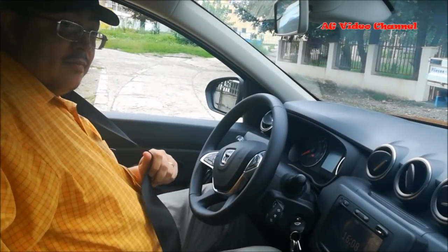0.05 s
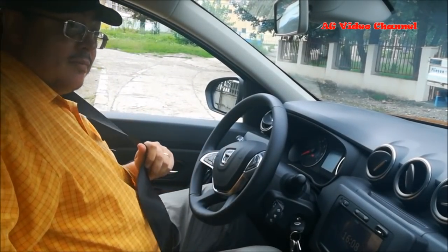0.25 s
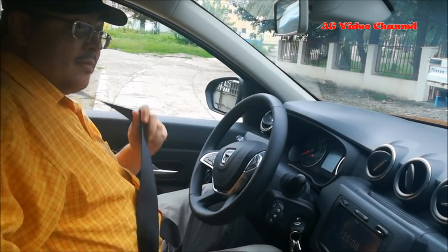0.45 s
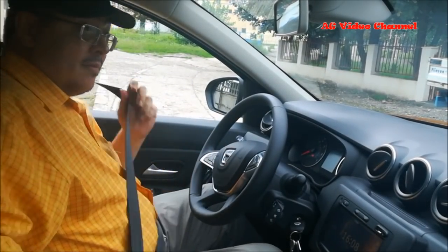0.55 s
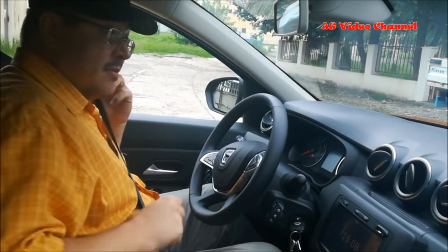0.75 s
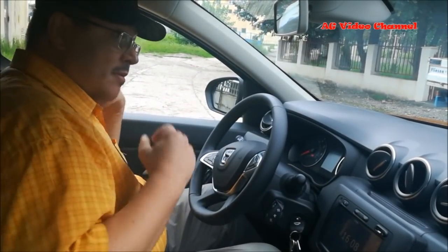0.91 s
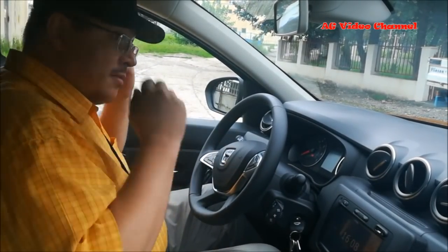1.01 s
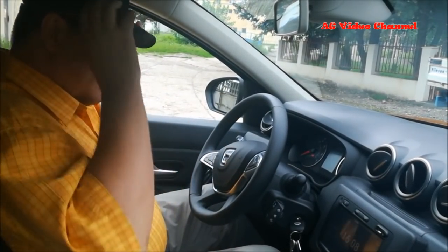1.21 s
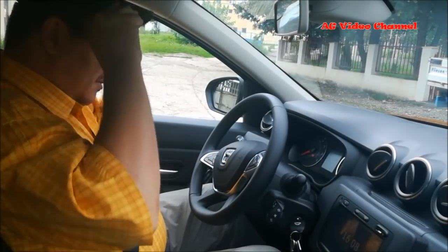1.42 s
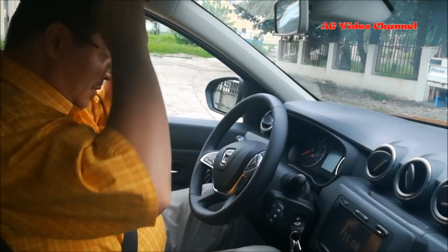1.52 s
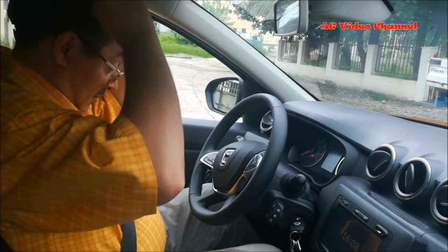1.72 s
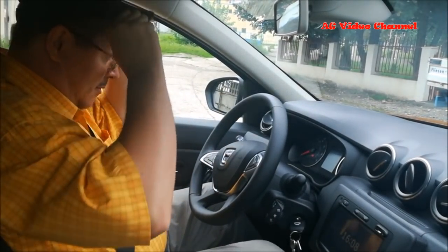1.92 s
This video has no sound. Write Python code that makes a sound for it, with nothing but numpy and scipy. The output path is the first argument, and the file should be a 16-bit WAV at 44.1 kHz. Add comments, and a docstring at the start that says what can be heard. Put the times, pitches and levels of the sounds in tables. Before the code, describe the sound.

A seat belt is unbuckled close to the microphone inside a quietly idling car. The button ticks, the latch snaps open with a thump, and the belt hisses and whirs back, knocking dully on the door before cloth rustles.

```python
"""A plastic button scrapes and ticks, then a seat belt latch snaps open and the steel tongue clacks,
close to a stereo microphone pair inside a parked, idling car. The buckle thumps into the seat.
The webbing hisses, groans and whirs back through its guide as the reel slows, and belt and elbow
knock dully on the door trim. At the end cloth rubs as an arm slips out of the belt."""
import sys
import numpy as np
from scipy import signal
from scipy.fft import rfft, irfft
from scipy.io import wavfile

SR = 44100
rng = np.random.default_rng(int(sys.argv[2]) if len(sys.argv) > 2 else 0)


def file_out(sig):
    """Save sig as 16-bit WAV at sys.argv[1]."""
    # one column per channel
    cols = np.atleast_2d(sig).T
    # limit, then scale
    lim = np.clip(cols, -1, 1)
    pcm = np.round(lim * 32767).astype(np.int16)
    wavfile.write(sys.argv[1], SR, pcm)


N = 85995
T = np.arange(N) / SR


def amp(db):
    """Decibels to gain."""
    return 10 ** (np.asarray(db) / 20)


def unit(x):
    """Scales to rms 1."""
    return x / np.sqrt(np.mean(x ** 2) + 1e-20)


def at_hz(points, hz):
    """Reads a table on a log-frequency axis."""
    f, value = np.transpose(points)
    return np.interp(np.log(hz + 1), np.log(f + 1), value)


def curves(rows):
    """Every column of a time table, sample by sample."""
    times, *columns = np.transpose(rows)
    return [np.interp(T, times, column) for column in columns]


def add(mix, start, sound):
    """Mixes a stereo sound in at start seconds."""
    part = mix[:, max(round(start * SR), 0):][:, :sound.shape[1]]
    part += sound[:, :part.shape[1]]


def noise(size=N):
    """Two channels of white noise."""
    return rng.standard_normal((2, size))


def decay(t, t60):
    """Falls 60 dB in t60."""
    return np.exp(-np.log(1000) * t / t60)


def low_pass(x, hz):
    """Steep band limit."""
    taps = signal.firwin(255, hz, window=("kaiser", 9), fs=SR)
    return signal.oaconvolve(x, taps[None], "same")


def resonate(x, hz, width_hz):
    """A steep resonance at hz, steady or gliding."""
    turn = np.exp(2j * np.pi * np.cumsum(hz * np.ones(N)) / SR)
    pole = np.exp(-np.pi * width_hz / SR)
    return unit((turn * signal.lfilter([1], [1, -2 * pole, pole * pole], x / turn)).real)


def friction(grains_per_s=1700, spread_db=-2, grain_share=0.28):
    """Threads catch and slip: a dense train of uneven grains over smooth hiss."""
    strength = amp(spread_db * np.minimum(rng.exponential(1, N), 4))
    grains = strength * (rng.random(N) < grains_per_s / SR)
    return np.sqrt(grain_share) * unit(grains * noise()) + np.sqrt(1 - grain_share) * noise()


# How alike the cabin sounds at the two microphones: f/Hz, likeness/-1..1
MIC_LIKENESS = [(60, 0.99), (150, .9), (300, 0.13), (450, -.12), (640, -0.68), (1450, 0.26), (2200, -0.19),
                (15000, .02)]
# Balance of belt and cabin at the pair: f/Hz, left over right/dB
CABIN_SIDE = [(200, -0.15), (400, -2), (700, -3.5), (1300, 3), (2400, -1.5), (4400, -3.5), (8000, -2),
              (15000, 5.5)]
LAG_S = .0006  # direct sound reaches the right microphone first
MIC_DELAYS_S = np.array([[LAG_S], [0]])

def at_mics(x, spectrum, side=CABIN_SIDE, direct_share=.14):
    """Colours two unrelated signals and blends them as the pair hears the cabin, at rms 1."""
    hz = np.fft.rfftfreq(x.shape[1], 1 / SR)
    left, unrelated = rfft(x)
    direct = direct_share * np.minimum(hz / 1000, 1) ** 2 * np.exp(2j * np.pi * hz * LAG_S)
    likeness = at_hz(MIC_LIKENESS, hz) + direct
    right = likeness * left + np.sqrt(np.maximum(1 - abs(likeness) ** 2, 0)) * unrelated
    lean_db = at_hz(side, hz) / 2
    pair = np.array([left * amp(lean_db), right * amp(-lean_db)])
    return unit(irfft(pair * amp(at_hz(spectrum, hz)), x.shape[1]))


# Engine hum, heard from inside: f/Hz, level/dB
ENGINE_TONES = [(100, -72.5), (199.5, -75)]
# Room tone of the cabin: f/Hz, relative density/dB
CABIN_AIR = [(15, -34.5), (25, 6), (70, -18), (102, -4), (130, -23.5), (189, -19.5), (222, -23.5),
             (299, -25.5), (513, -34), (1390, -27.5), (1870, -33.5), (4450, -27.5), (15800, -35.5)]

def idling_car(waver=0.4, air_db=-64.5):
    """A faint wavering engine hum under the still air around the microphones."""
    hum = np.zeros((2, N))
    for hz, db in ENGINE_TONES:
        tone = np.sqrt(2) * np.sin(2 * np.pi * (hz * T + rng.random()))
        hum += amp(db) * (tone + waver * resonate(noise(), hz, width_hz=18))
    return hum + amp(air_db) * at_mics(noise(), CABIN_AIR)


# Movement in the driver's seat: t/s, level/dB
SEAT_SHIFT = [(0, -46.5), (.04, -49.5), (.1, -52.5), (.19, -55), (.28, -50.5), (.34, -55.5), (.45, -57),
              (.56, -53), (.75, -64), (.95, -53.5), (1.03, -65.5), (1.15, -69), (1.35, -77)]
# Colour of the cushion: f/Hz, relative density/dB
CUSHION_COLOUR = [(25, -5.5), (60, 2.5), (130, 8.5), (230, -3), (300, -9.5), (430, -30), (900, -31.5),
                  (3000, -64)]

def cushion():
    """The driver's weight shifts on the padding with a dull rumble."""
    return amp(curves(SEAT_SHIFT)[0]) * at_mics(noise(), CUSHION_COLOUR)


# The arm slips out of the belt: t/s, level/dB, brightness/0..1
SLEEVE_RUB = [(1.52, -83.5, .1), (1.58, -65, 0), (1.61, -75, 0), (1.69, -67.5, 0.05), (1.75, -60, 0.17),
              (1.8, -55, 0.06), (1.85, -57.5, 0.46), (1.92, -51.5, 1), (1.95, -55, 0.64)]
# Colours of a slow and a fast rub: f/Hz, relative density/dB
SLOW_CLOTH = [(80, -7), (200, 7.5), (380, -0.5), (550, 8.5), (760, -0.5), (1300, -3.5), (1650, 0.5),
              (2200, -4.5), (2800, -4.5), (3250, -0.5), (4100, -15.5), (6500, -7.5), (15000, -18)]
FAST_CLOTH = [(150, -5), (550, -4), (900, -10), (1600, -7), (2400, -9), (3400, 4), (4100, -8.5), (5500, -7),
              (7500, -1.5), (10000, -9), (15500, -14)]

def sleeve():
    """Cloth rubs nearby, brighter as it speeds up."""
    db, brightness = curves(SLEEVE_RUB)
    dull = np.sqrt(1 - brightness) * at_mics(friction(), SLOW_CLOTH)
    bright = np.sqrt(brightness) * at_mics(friction(), FAST_CLOTH)
    return amp(db) * (dull + bright)


# The reel turning beside the seat: t/s, level/dB
REEL_RUMBLE = [(.22, -62.5), (.32, -63.5), (.42, -62.5), (.6, -55), (.68, -55.5), (.8, -54.5), (.9, -60),
               (.97, -83.5), (1.1, -71.5)]
# Colour of reel and groan: f/Hz, relative density/dB
REEL_COLOUR = [(100, -25), (250, 1), (380, 0.5), (520, -8), (680, -1), (900, -8), (3000, -55)]
# The belt lifts off the shoulder: t/s, f/Hz, level/dB
BELT_GROAN = [(.58, 280, -67), (.606, 335, -48), (.62, 360, -41), (.634, 480, -59), (.648, 680, -53),
              (.70, 700, -63)]

def reel_and_groan():
    """The reel rumbles as it winds; a short low rub rises in pitch as the belt tightens."""
    rumble = amp(curves(REEL_RUMBLE)[0]) * at_mics(friction(), REEL_COLOUR)
    hz, db = curves(BELT_GROAN)
    rubbing = (T > BELT_GROAN[0][0]) & (T < BELT_GROAN[-1][0])
    groan = at_mics(resonate(friction(), hz, width_hz=170), REEL_COLOUR)
    return rumble + rubbing * amp(db) * groan


# Webbing sliding past the microphones: t/s, rasp level/dB, hiss level/dB
BELT_SLIDE = [(0, -77.5, -88), (.1, -58, -61), (.19, -66.5, -101), (.28, -58.5, -63.5), (.33, -62.5, -77),
              (.40, -44.5, -51), (.44, -51, -57), (.5, -45, -53), (.57, -59, -67), (.62, -61, -67.5),
              (.68, -52, -52.5), (.75, -57, -60.5), (.83, -57.5, -69), (.864, -51.5, -67),
              (.92, -60.5, -70.5), (1.05, -67, -73), (1.27, -67.5, -71), (1.45, -73.5, -72.5)]
# Colours of the rasp and the fine hiss: f/Hz, relative density/dB
RASP_COLOUR = [(200, -6.5), (600, -3), (1600, -2), (2000, 0), (3100, 4), (4000, -1.5), (5000, 1), (6800, 0),
               (9000, -7.5), (15000, -27)]
HISS_COLOUR = [(3000, -27), (7000, 1.5), (9000, 0.5), (12000, -2.5), (15500, -4.5)]
# The weave running over the guide: t/s, f/Hz, level/dB
WEAVE_WHIR = [(.73, 5750, -70), (.77, 5660, -59), (.83, 5640, -59), (.865, 5500, -71), (.915, 5250, -62.5),
              (.98, 4900, -59), (1.06, 4800, -60), (1.13, 4930, -68.5), (1.35, 4900, -77)]

def webbing(guide_hz=6650, guide_db=-2, flutter_db=2.8):
    """The belt rasps over shirt and guide; its fluttering whir sinks as the reel slows."""
    rasp_db, hiss_db = curves(BELT_SLIDE)
    rasp = amp(rasp_db) * at_mics(friction(), RASP_COLOUR)
    hiss = amp(hiss_db) * at_mics(friction(), HISS_COLOUR)
    whir_hz, whir_db = curves(WEAVE_WHIR)
    weave = resonate(friction(), whir_hz, width_hz=330)
    guide = amp(guide_db) * resonate(friction(), guide_hz, width_hz=1260)
    flutter = resonate(noise()[0], 0, width_hz=30)
    running = (T > WEAVE_WHIR[0][0]) & (T < WEAVE_WHIR[-1][0])
    whir = running * amp(whir_db + flutter_db * flutter) * at_mics(weave + guide, RASP_COLOUR)
    return rasp + hiss + whir


# Belt and elbow on the door trim, buckle stalk into the seat: t/s, level/dB, contact/s
TRIM_KNOCKS = [(.838, -33, 0.0038), (.8735, -35.5, .0003), (.8865, -38.5, 0.00055), (.906, -51.5, 0.0026),
               (.934, -39.5, 0.003), (1.208, -28, 0.008), (1.227, -39.5, 0.0058)]
SEAT_THUMPS = [(.002, -38, 0.00084), (.060, -31.5, .002), (.076, -35, 0.00191), (.102, -41, .004),
               (.135, -47, 0.0017), (.2255, -27, 0.00023), (.2325, -19.5, 0.0038), (.411, -29.5, 0.0023),
               (.531, -47, 0.0015)]
# Modes of trim and seat: f/Hz, relative level/dB, t60/s
TRIM_MODES = [(155.7, 6, 0.079), (293.4, 5, 0.12), (338, 10.5, 0.06), (413.4, -7, 0.13), (555, -10, 0.053)]
SEAT_MODES = [(45, -7.5, 0.0393), (85, 3.5, 0.058), (127.7, 0, 0.082), (160, -4, 0.12),
              (237.3, 10.5, 0.045), (290, -4, .1), (393.3, -9.5, .15), (482, -8, 0.17), (703.5, -3, 0.037)]

def blows(rows, modes, rise_s=0.0031, cabin_db=-9, cabin_t60=.2):
    """Soft blows ring a damped body, duller the longer the contact; the cabin adds a brief boom."""
    out, t = np.zeros((2, N)), T[:SR // 3]
    heard = np.maximum(t - MIC_DELAYS_S, 0)
    for start, db, contact in rows:
        ring = sum(amp(mode_db) * np.exp(-2 * hz * contact)
                   * decay(heard, t60) * np.sin(2 * np.pi * hz * heard) for hz, mode_db, t60 in modes)
        ring *= 1 - np.exp(-heard / rise_s)
        cabin = noise(len(t))[0] * decay(t, cabin_t60)
        boom = signal.fftconvolve(ring[1], cabin / np.linalg.norm(cabin))[:len(t)]
        add(out, start, amp(db) * (ring + amp(cabin_db) * boom))
    return out


# Balance of the buckle at the pair: f/Hz, left over right/dB
BUCKLE_BALANCE = [(250, -2.5), (700, -5), (1100, 1), (1500, 9), (2100, 0.5), (2800, 0), (4500, -3),
                  (6200, -3.5), (8500, 0), (14000, 5.5)]
# Modes of latch and tongue: f/Hz, relative level/dB
STEEL_MODES = [(1082, 0), (1450, 3.5), (4452, -3), (4815, -5.5), (6082, -2.5), (6440, -3), (6762, 1),
               (7908, -6), (11700, -13), (13105, -5), (13814, -8)]

def clicks(rows, colour, ring_db, rise_s=.0005, chatter_s=.002, pivot_hz=4050):
    """Each click chatters, then dies as a dense burst from the struck part with a short steel ring."""
    out, t = np.zeros((2, N)), T[:SR // 4]
    dying = np.maximum(t - chatter_s, 0)
    for start, db, tilt_db, t60 in rows:
        tilted = [(hz, level + tilt_db * np.log2(max(hz, 1000) / pivot_hz)) for hz, level in colour]
        shell = at_mics(noise(len(t)), tilted, BUCKLE_BALANCE)
        hollow = low_pass(shell, hz=2000)  # the housing's hollow outlasts its treble
        burst = hollow * decay(dying, t60 * 1.15) + (shell - hollow) * decay(dying, t60)
        tail = amp(-41) * shell * decay(t, t60=.15)
        ring = np.zeros_like(shell)
        for hz, mode_db in STEEL_MODES:
            lean_db = at_hz(BUCKLE_BALANCE, hz) * np.array([[.5], [-.5]])
            gain = amp(ring_db + mode_db + tilt_db * np.log2(hz / pivot_hz) + lean_db)
            ring += gain * decay(t, t60=.058) * np.sin(2 * np.pi * hz * (t - MIC_DELAYS_S))
        add(out, start, amp(db) * np.minimum(t / rise_s, 1) * (burst + tail + ring))
    return out


# The thumb drives the button down its slot, hardest as the latch gives: t/s, level/dB
BUTTON_SCRAPE = [(0, -69.5), (.05, -53), (.075, -48), (.105, -71), (.135, -48.5), (.197, -80.5),
                 (.216, -43), (.228, -39)]
# Strikes in the buckle: t/s, level/dB, tilt/dB per octave, t60/s
BUTTON_TICKS = [(.0495, -34.5, -3, 0.12), (.0592, -35.5, 3.5, 0.073), (.068, -39.5, 2, 0.036),
                (.1283, -40.5, 1.5, 0.076), (.144, -52, -2.5, 0.033)]
LATCH_SNAPS = [(.2259, -9.5, -1.1, .037), (.2292, -21, .8, .046), (.2425, -30, -2, .045),
               (.2535, -39.5, -.5, .035)]
TONGUE_CLACKS = [(.4052, -28, 0.7, 0.062), (.5098, -45.5, -4.5, 0.067)]
# Colours of plastic button, latch housing and steel tongue: f/Hz, relative density/dB
BUTTON_COLOUR = [(500, -33), (1000, -2.5), (1650, -2), (2500, -8), (3700, 7), (4600, -1), (5500, 1),
                 (6300, 7), (8200, -4.5), (9400, -0.5), (12000, -16.5), (16000, -16.5)]
HOUSING_COLOUR = [(100, -13), (350, -3.5), (540, -11.5), (850, -4.5), (1080, 0), (1250, 2), (1490, -4),
                  (1800, 2.5), (2300, -8.5), (3200, -1.5), (4000, -0.5), (4600, -1.5), (5300, -4),
                  (6500, 4), (7600, 0), (10500, -3), (12500, 0.5), (15500, 1), (16800, -15.5)]
TONGUE_COLOUR = [(600, -21), (1000, -13), (1350, 3.5), (1780, 9.5), (2150, -8.5), (3200, -0.5), (4600, 1.5),
                 (6800, 2.5), (9000, -3), (13000, -8), (16000, -16)]

def buckle():
    """Close up, plastic scrapes on plastic and ticks, the latch lets go and the freed tongue clacks."""
    pressing = T < BUTTON_SCRAPE[-1][0]
    plastic = at_mics(resonate(friction(), hz=1626, width_hz=420), BUTTON_COLOUR, BUCKLE_BALANCE)
    scrape = pressing * amp(curves(BUTTON_SCRAPE)[0]) * plastic
    button = clicks(BUTTON_TICKS, BUTTON_COLOUR, ring_db=-27.5, rise_s=.0015)
    latch = clicks(LATCH_SNAPS, HOUSING_COLOUR, ring_db=-15.5)
    tongue = clicks(TONGUE_CLACKS, TONGUE_COLOUR, ring_db=-17)
    return scrape + button + latch + tongue


def scene():
    """Inside the car: engine, driver and belt behind, knocks and buckle in front."""
    soft = idling_car() + cushion() + sleeve() + reel_and_groan() + webbing()
    knocks = blows(TRIM_KNOCKS, TRIM_MODES) + blows(SEAT_THUMPS, SEAT_MODES)
    return low_pass(soft, hz=15900) + knocks + buckle()


def record(dry):
    """The loudest peaks at the microphones round off, and the highest treble is cut."""
    return low_pass(np.tanh(dry), hz=16400)


dry = scene()
out = record(dry)
file_out(out)
```